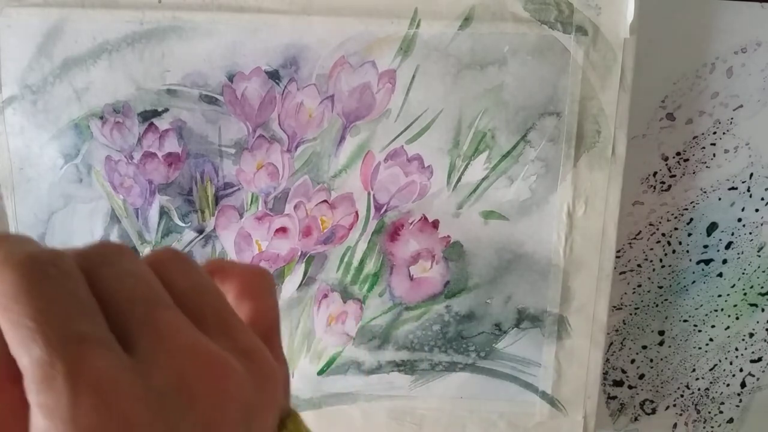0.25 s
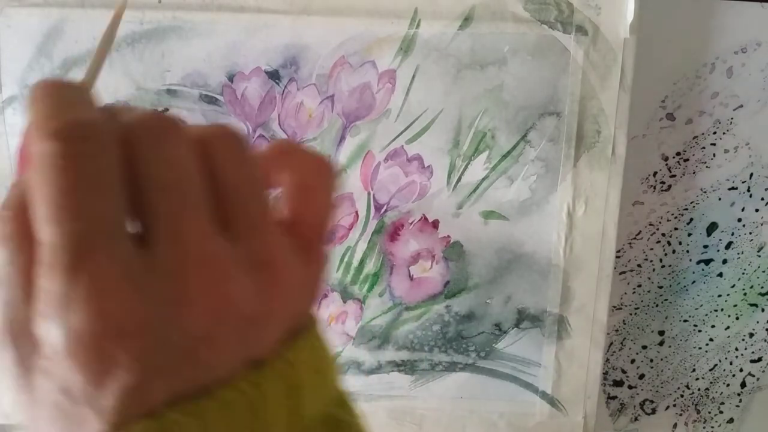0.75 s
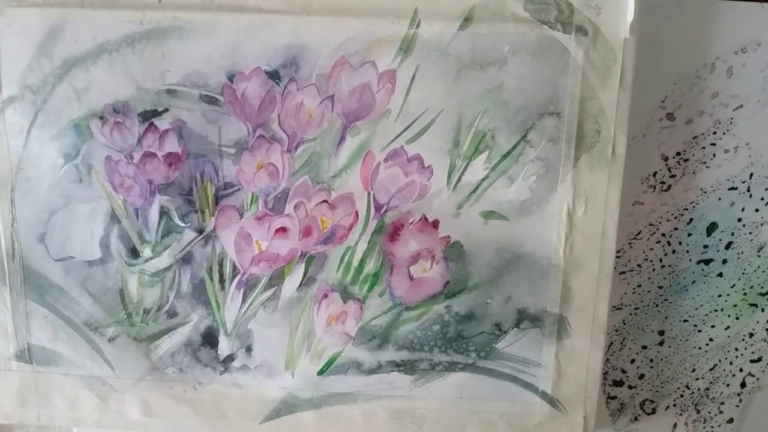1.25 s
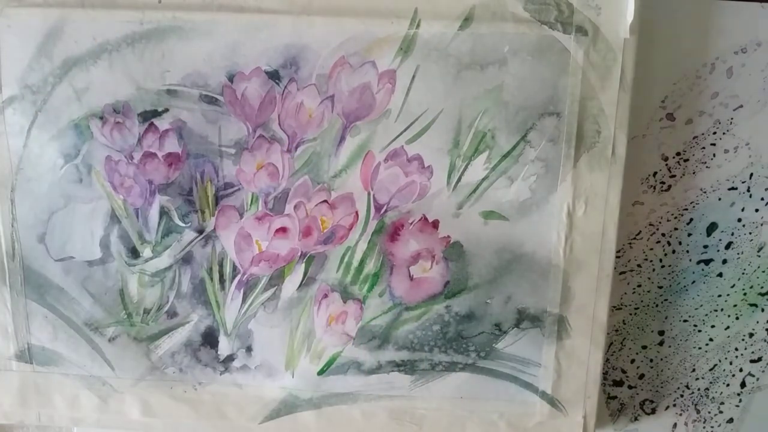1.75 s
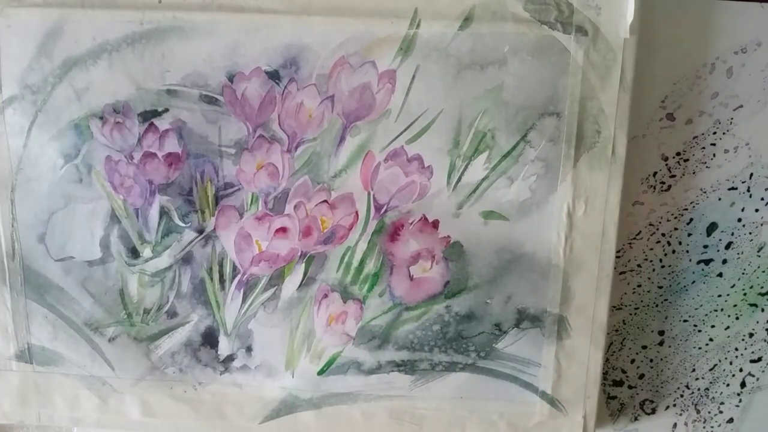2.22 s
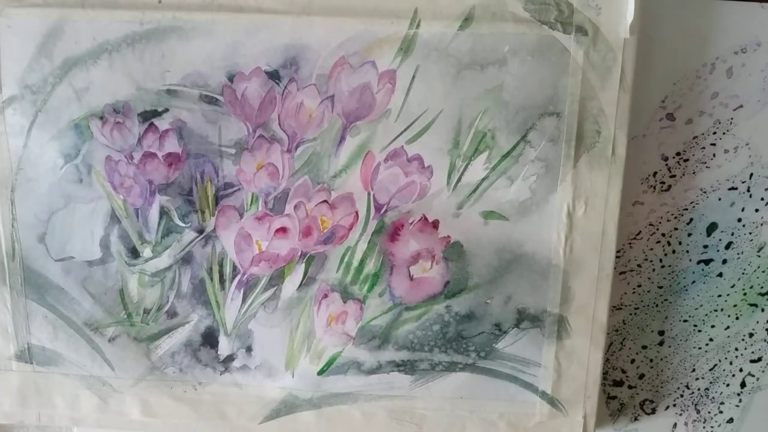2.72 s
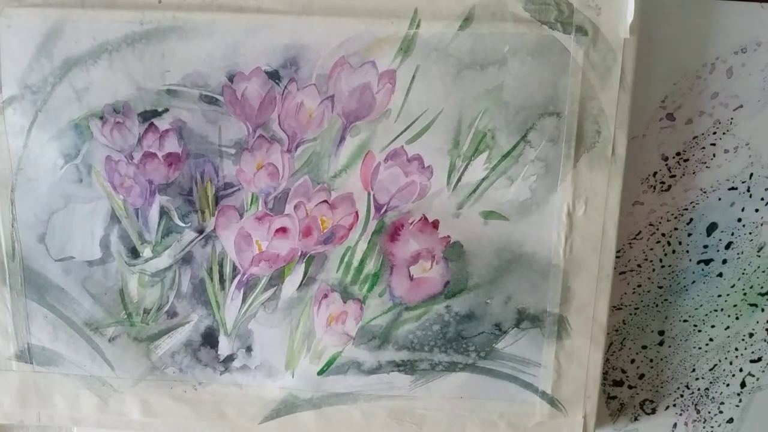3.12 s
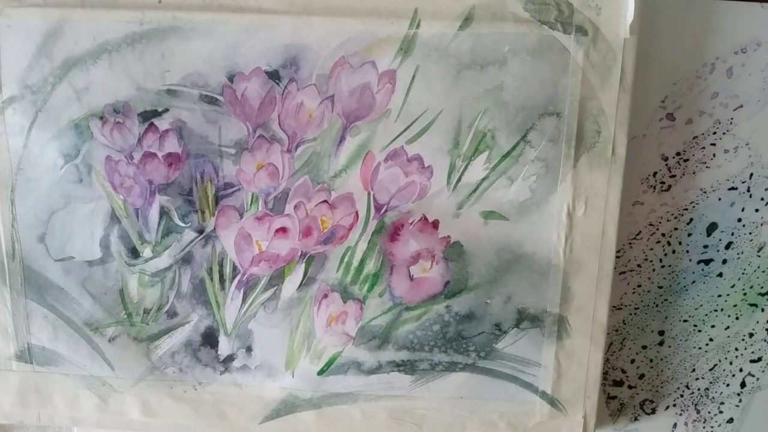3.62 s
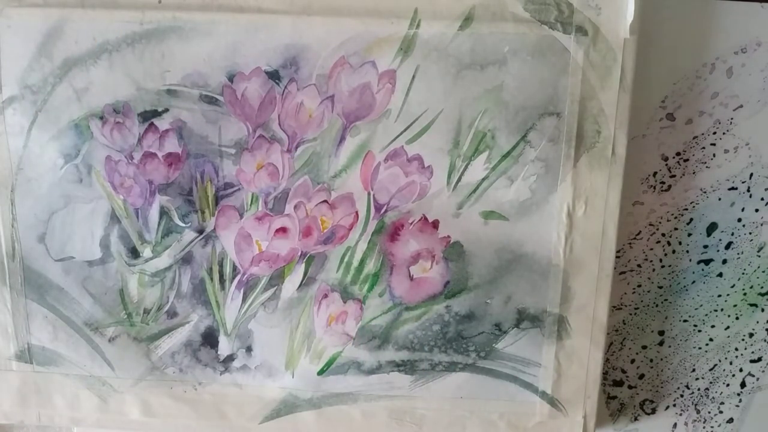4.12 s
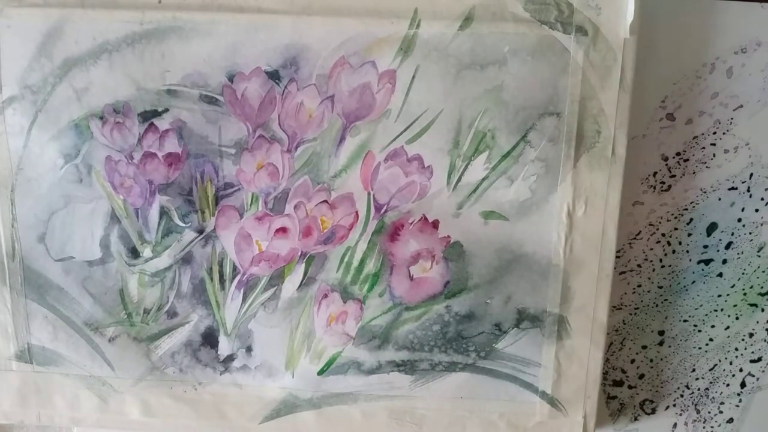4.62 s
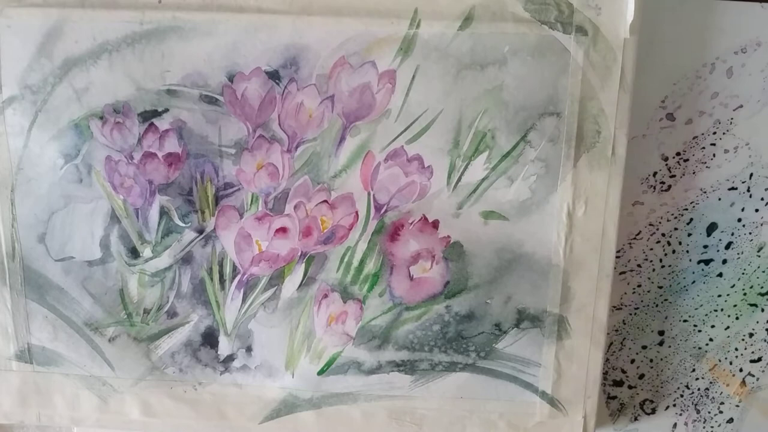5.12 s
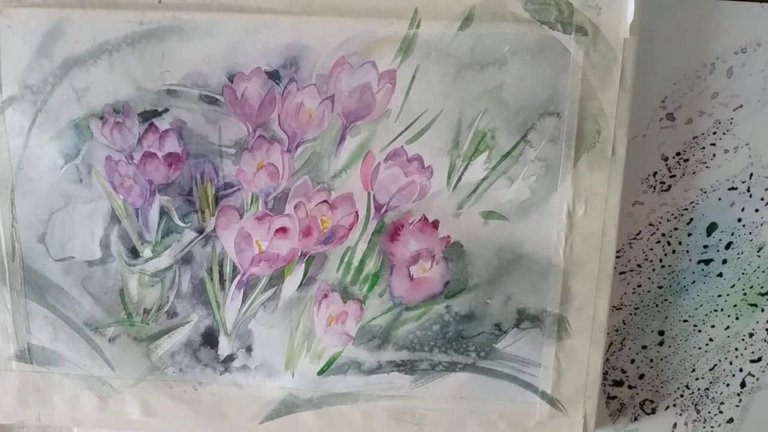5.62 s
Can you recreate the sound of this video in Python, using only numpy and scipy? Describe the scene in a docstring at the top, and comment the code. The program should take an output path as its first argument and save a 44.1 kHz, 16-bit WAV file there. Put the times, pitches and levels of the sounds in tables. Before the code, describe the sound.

A paintbrush is rinsed at a painting table, a little to the right of a stereo microphone. Faint bristle strokes and a dull knock come first. Then the water briefly chirps and fizzes while the metal ferrule clicks sharply on the glass jar, making it ring briefly. Small dry handle taps and two separate clicks follow. A woollen sleeve rustles softly on and off over the low hum and hiss of a small room.

```python
"""A paintbrush is rinsed in a glass water jar, to the right of a stereo microphone over a painting table. Its
ferrule clicks on the glass and sets the jar ringing; air pockets chirp and fizz in the water. The handle taps,
the table gives dull knocks, and before the rinse the bristles drag over paper. A woollen sleeve rustles, and
the stirred brush swishes steadily in the water. Behind it all is a small quiet room with a low murmur, a faint
hum and hiss."""
import sys
import numpy as np
from scipy import signal
from scipy.fft import rfft, irfft, next_fast_len
from scipy.io import wavfile
from scipy.ndimage import uniform_filter1d, map_coordinates

SR = 44100
rng = np.random.default_rng(int(sys.argv[2]) if len(sys.argv) > 2 else 0)


def dump_mix(stems):
    """Bounce the given channels to the path in sys.argv[1] as a 16-bit WAV at rate SR."""
    frames = np.atleast_2d(stems).T  # one column per channel
    limited = np.clip(frames, -1, 1)  # hard clip at full scale
    pcm = np.round(limited * 32767).astype(np.int16)
    wavfile.write(sys.argv[1], SR, pcm)


N = 258639


def amp(db):
    return 10 ** (np.asarray(db) / 20)


def unit_rms(x):
    return x / np.sqrt(np.mean(x ** 2) + 1e-20)


def curve(points, hz):
    """Reads (f/Hz, value) breakpoints on a log frequency axis."""
    f, values = np.transpose(points)
    return np.interp(np.log(hz + 1), np.log(f + 1), values)


def wobble(rate):
    """Smooth random modulation, rate knots a second."""
    return map_coordinates(rng.standard_normal(int(N * rate / SR) + 4), [np.arange(N) * rate / SR])


def swell(peak, rise, fall):
    """Envelope of one gesture, 13 dB down at one rise time before its peak and one fall time after."""
    t = np.arange(N) / SR - peak
    return amp(-13 * np.abs(t / np.where(t < 0, rise, fall)) ** 1.3)


def filtered(x, response):
    """Filters x with a complex frequency response."""
    n = x.shape[-1]
    size = next_fast_len(n + 8192)
    return irfft(rfft(x, size) * response(np.fft.rfftfreq(size, 1 / SR)), size)[..., :n]


def resonators(modes, passes=1):
    """Response of a band-pass bank (f/Hz, width/Hz, level/dB), run passes times in series."""
    return lambda f: sum((-1) ** k * amp(db) * 1j * f * width / (hz * hz - f * f + 1j * f * width)
                         for k, (hz, width, db) in enumerate(modes)) ** passes


def ring(modes, t, attack_s):
    """Damped modes (f/Hz, level/dB, t60/s), balanced a little differently on each hit."""
    tones = sum(amp(db + rng.normal(0, 1.0) - 60 * t / t60) * np.sin(2 * np.pi * hz * t)
                for hz, db, t60 in modes)
    return tones * (1 - np.exp(-t / attack_s))


def noise_bed(spectrum, correlation, patchy_db, top_hz=15750):
    """Shaped stereo noise of rms 1, its gain mottled over time and frequency."""
    bins = signal.stft(rng.standard_normal((2, N)), nperseg=512)[2]
    patches = uniform_filter1d(rng.standard_normal(bins.shape[1:]), size=6, axis=0)
    patches = unit_rms(uniform_filter1d(patches, size=10, axis=1))
    noise = signal.istft(bins * amp(patchy_db * patches), nperseg=512)[1][:, :N]

    def mid_side_eq(hz):
        spread = np.arccos(np.clip(curve(correlation, hz), -1, 1)) / 2
        return amp(curve(spectrum, hz)) * (hz < top_hz) * [np.cos(spread), np.sin(spread)]

    mid, side = filtered(noise, mid_side_eq)
    return unit_rms(np.array([mid + side, mid - side]))


# Decay of the room: f/Hz, t60/s
ROOM_DECAY = [(300, 0.42), (2000, 0.31), (8000, 0.12), (15000, 0.12)]


def place(out, start, sound, pan_db, room_db, left_lag=13):
    """Mixes in a sound with its own room tail, left_lag samples late on the left; pan_db > 0 is left."""
    sound = np.broadcast_to(sound, (2, sound.shape[-1]))
    hz, t, bins = signal.stft(rng.standard_normal((2, SR // 3)), SR, nperseg=128)
    tail = signal.istft(bins * amp(-60 * t / curve(ROOM_DECAY, hz)[:, None]), SR, nperseg=128)[1]
    predelay = round(0.0028 * SR)
    tail = np.pad(tail / np.linalg.norm(tail[0]), ((0, 0), (predelay, 0)))
    heard = amp(room_db) * signal.fftconvolve(sound[1:], tail, axes=1)
    heard[:, :sound.shape[1]] += sound * amp([[pan_db / 2], [-pan_db / 2]])
    for side, lag in enumerate((left_lag, 0)):
        out[side, round(start * SR) + lag:][:heard.shape[1]] += heard[side]


# Colour of the murmur: f/Hz, level/dB
MURMUR_EQ = [(30, -12), (68, -28), (95, -10.5), (125, -12), (175, -3.5), (250, -3), (380, -12), (430, -8),
             (470, -11), (640, -14), (1500, -15.5), (3000, -120)]
# Stereo image of the murmur: f/Hz, left-right correlation (clipped to -1..1 when played)
MURMUR_IMAGE = [(60, 1), (240, 0.37), (950, 0.18), (3770, -2.1), (15000, -0.67)]
# Colour of the hiss: f/Hz, level/dB
HISS_EQ = [(900, -77), (1500, -2), (3000, -3), (8000, -3.5), (9500, -2), (11000, 1.5), (13000, -2),
           (14500, -3.5)]


def room_tone():
    """Low murmur of the house, microphone hiss and a faint wavering hum."""
    hum_level = amp(-72.5 + 3.9 * wobble(15))
    hum_hz = 425 + 8 * wobble(25)
    hum = hum_level * np.sin(2 * np.pi * np.cumsum(hum_hz) / SR)
    murmur = amp(-62.5) * noise_bed(MURMUR_EQ, MURMUR_IMAGE, patchy_db=1.0)
    hiss = amp(-59.5) * noise_bed(HISS_EQ, [(5000, 0.0096)], patchy_db=1.6)
    return murmur + hiss + hum


# Colours of the rustles' airy hiss and of their coarser rub: f/Hz, level/dB
RUSTLE_HISS_EQ = [(2500, -120), (4000, -52), (5500, -8), (6500, 4.5), (8500, 4.5), (11000, 6), (15100, 4),
                  (16000, -5)]
RUSTLE_RUB_EQ = [(500, -120), (1300, -8.5), (2300, -8), (3100, -5), (4000, -4.5), (4900, -5.5), (6200, -2.5),
                 (7500, -32), (9000, -120)]
# Rustles: sleeve moves, and from 2.0 to 2.95 s the steady swish of the brush stirred in the water: peak t/s,
# rise/s, fall/s, hiss level/dB, rub against hiss/dB, pan/dB
RUSTLES = [(.675, 0.029, 0.029, -52.5, -9, 5), (.705, 0.036, 0.053, -52, -5, 2),
           (1.39, 0.096, 0.041, -57, -7, -1), (1.53, 0.13, 0.2, -49, -10, 2),
           (2.0, 0.58, 0.13, -57, -6.5, -1), (2.52, 1, 0.2, -56, -3.5, -1.5),
           (2.95, 0.91, 0.33, -61.5, -6.5, -0.5), (4.47, 0.043, 0.065, -62, -5.5, -1),
           (4.66, 0.13, 0.35, -56, -11, -0.5), (4.84, 0.12, 0.32, -56.5, -7, -1),
           (5.35, 0.23, 0.1, -54.5, -15, 2), (5.86, 0.31, .1, -61.5, -12, 2)]


def rustles():
    """Wool fibres slip over each other, and the stirred brush swishes the water: a fine hiss and a coarser rub,
    both slightly grainy."""
    hiss_power, rub_power = np.zeros((2, 2, N))
    for peak, rise, fall, db, rub_db, pan_db in RUSTLES:
        power = (amp(db + np.array([[.5], [-.5]]) * pan_db) * swell(peak, rise, fall)) ** 2
        hiss_power += power
        rub_power += amp(rub_db) ** 2 * power
    grain = amp(.7 * wobble(40) + wobble(200))
    rub = np.sqrt(rub_power) * noise_bed(RUSTLE_RUB_EQ, [(2000, .1)], patchy_db=3)
    hiss = np.sqrt(hiss_power) * noise_bed(RUSTLE_HISS_EQ, [(5000, .02)], patchy_db=1.8)
    return amp(2.5) * grain * (hiss + rub * amp(2 * wobble(130)))


# Strokes on paper, then on the jar's rim: peak t/s, rise/s, level/dB, centre f/Hz, width/Hz
BRUSH_STROKES = [(.18, 0.043, -70, 1930, 1500), (.47, 0.24, -63.5, 2180, 3000),
                 (.672, 0.025, -53, 4640, 1600), (.73, 0.071, -68, 2300, 348), (1.03, .09, -69, 1960, 1500),
                 (2.01, .09, -59, 12400, 2000), (2.13, 0.07, -60, 12100, 2000)]


def bristles():
    """Bristles slip over a surface in small grains; each stroke has its own band."""
    out = np.zeros((2, N))
    grains = amp(3.5 * wobble(150)) * rng.standard_normal((2, N))
    for peak, rise, db, hz, width in BRUSH_STROKES:
        band = unit_rms(filtered(grains, resonators([(hz, width, 0)], passes=2)))
        out += amp(db + 4) * swell(peak, rise, fall=0.065) * band
    return out


# Modes of the table top: f/Hz, level/dB, t60/s
TABLE_MODES = [(192.6, -10.5, 0.18), (243, 0.5, 0.097), (305, 5, 0.043), (347, 2.5, 0.042),
               (442, 0.5, 0.061), (706, -2.5, 0.024)]
# Knock cues: t/s, level/dB
TABLE_KNOCKS = [(1.922, -30.5), (2.665, -50.5), (3.0548, -47)]


def table_knocks(rebound_s=.0165, dulling_db_per_khz=28):
    """Slow pushes ring the table top; each settles in two duller rebounds."""
    out, t = np.zeros((2, N + SR)), np.arange(SR // 3) / SR
    for start, db in TABLE_KNOCKS:
        for k in range(3):
            modes = [(hz, level - k * dulling_db_per_khz * hz / 1000, t60)
                     for hz, level, t60 in TABLE_MODES]
            thud = amp(db) * ring(modes, t, attack_s=0.0057)
            place(out, start + k * rebound_s, thud, pan_db=-1.5, room_db=-10)
    return out[:, :N]


# Modes of the handle: multiple of the tap's pitch, level/dB, t60/s
HANDLE_MODES = [(1, 0, .013), (1.35, -4, .008), (.7, -6, .008)]
# Tap cues: t/s, level/dB, f/Hz
HANDLE_TAPS = [(.487, -46, 1280), (2.985, -37.5, 1710), (2.9937, -37, 1800), (3.012, -42, 1880),
               (4.313, -45.5, 5160)]


def handle_taps():
    """The wooden handle gives small dry taps that die at once."""
    out, t = np.zeros((2, N + SR)), np.arange(SR // 3) / SR
    for start, db, hz in HANDLE_TAPS:
        modes = [(ratio * hz, level, t60) for ratio, level, t60 in HANDLE_MODES]
        tap = amp(db) * ring(modes, t, attack_s=.0004)
        place(out, start, tap, pan_db=-1.5, room_db=-14, left_lag=3)
    return out[:, :N]


def air_pocket(start_hz, end_hz, length, flutter_per_s=250):
    """One bubble rings: a tone that swells fast, glides, flutters and fades."""
    progress = np.arange(round(length * SR)) / (length * SR)
    hz = start_hz + (end_hz - start_hz) * progress ** 1.35
    knots = rng.standard_normal(2 + round(flutter_per_s * length))
    flutter = amp(2.3 * np.interp(progress, np.linspace(0, 1, len(knots)), knots))
    envelope = np.sin(np.pi * progress ** .5) ** 1.08
    return flutter * envelope * np.sin(2 * np.pi * np.cumsum(hz) / SR)


# Single bubbles: t/s, start f/Hz, end f/Hz, length/s, level/dB, pan/dB
BUBBLE_CHIRPS = [(2.1625, 2930, 3100, 0.0085, -29, -2), (2.167, 7850, 7900, 0.0031, -29, -4),
                 (2.171, 2940, 3080, 0.0096, -41.5, 0), (2.179, 896, 1020, 0.052, -42, 0),
                 (2.21, 1174, 2320, 0.026, -44, -7), (2.23, 1430, 2460, 0.0162, -44, -9),
                 (2.291, 1390, 1270, 0.017, -32, -1), (2.295, 1194, 1280, 0.021, -39.5, 1),
                 (2.288, 272.6, 267, 0.16, -53, -3), (2.331, 1204, 2250, 0.022, -42, -12.5),
                 (2.339, 1374, 1890, 0.0176, -46, -11), (2.469, 2850, 3220, 0.008, -29.5, 3),
                 (2.537, 2870, 3170, 0.01, -51, -7), (2.548, 2970, 3220, 0.0095, -49, -9),
                 (3.071, 276, 260, 0.088, -55.5, -1), (4.091, 257, 245, 0.053, -54, 5),
                 (4.137, 240, 232, 0.065, -54, 3), (4.216, 223, 180, 0.11, -55, 0)]
# Clouds of tiny bubbles: start t/s, end t/s, count, centre f/Hz, level/dB
FIZZ_CLOUDS = [(2.22, 2.28, 20, 1800, -61), (2.3, 2.41, 45, 1900, -59.5), (2.51, 2.66, 100, 4500, -61)]


def bubbles():
    """Air rings in the water: larger pockets one by one, tiny ones in fading clouds."""
    out = np.zeros((2, N + SR))
    for start, start_hz, end_hz, length, db, pan_db in BUBBLE_CHIRPS:
        place(out, start, amp(db) * air_pocket(start_hz, end_hz, length), pan_db, room_db=-17)
    for start, end, count, centre_hz, db in FIZZ_CLOUDS:
        cloud = np.zeros(round((end - start) * SR) + SR // 20)
        for when, pitch, strength in rng.random((int(count), 3)):
            hz = centre_hz * np.exp(.9 * (pitch - .5))
            blip = amp(5 * strength + 12.5 - 33 * when) * air_pocket(hz, 1.2 * hz, length=14 / hz)
            cloud[round(when * (end - start) * SR):][:len(blip)] += blip
        place(out, start, amp(db) * cloud, pan_db=-2, room_db=-8)
    return out[:, :N]


# Colour of the click's attack: f/Hz, level/dB
CRACK_EQ = [(2060, -20), (2800, -3), (3500, -40), (3760, -37), (4550, -13), (5400, -2.5), (6320, -14.5),
            (7850, 0), (8430, -0.5), (12500, 2), (15700, -1), (16800, -69)]


def glass_crack(burst, notch_depth, notch_hz=5360, half_width_hz=720):
    """The bright edge of a hit, scooped in the quiet band between the glass wall's rings."""
    def response(hz):
        low_cut = hz ** 4 / (hz ** 4 + 3000 ** 4)
        notch = 1 - notch_depth * np.exp(-((hz - notch_hz) / half_width_hz) ** 4)
        return amp(curve(CRACK_EQ, hz)) * low_cut * notch

    return filtered(burst, response)


# Bright ring of the glass wall: f/Hz, width/Hz, level/dB
WALL_MODES = [(4530, 150, 3), (6160, 76, 1.5), (6380, 190, 2), (6950, 63, -6), (7800, 100, 1)]
# Lower ring of the filled jar: f/Hz, width/Hz, level per pass/dB
BODY_MODES = [(2700, 2850, -2.5), (2950, 420, 3.5), (3390, 360, -10)]
# Hollow knock of the jar's air and base: f/Hz, level/dB, t60/s
HOLLOW_MODES = [(538, 9, 0.053), (324, 1.5, 0.055), (725, 2, 0.042), (940, 2, 0.032), (1194, 5, 0.035)]
# Hits: t/s, level/dB, table bounce gain, wall ring/dB, body ring/dB, knock/dB, pan/dB, notch depth
FERRULE_HITS = [(2.2911, -8, 2.1, 0, -10, -48, -0.5, 0.81), (2.2976, -27, 0.69, 11.5, -12, -22.5, -12, .9),
                (2.3175, -34, 0.5, 2, -12, -25, -2, .9), (2.4690, -18, 0.36, 1.5, 3.5, -26, -1.5, .02),
                (2.4819, -22.5, 0.43, 2, 6, -31, -6, .02), (2.4965, -26.5, 0.68, 1.5, 2, -30, -4, .02),
                (3.8395, -9, 0.64, -34, -17, -37.5, -1.5, 0.064),
                (4.0636, -10, 1.1, -16.5, -30, -37.5, -4, .05)]


def ferrule_clicks():
    """Metal strikes glass: a spike, its bounce off the table and its scatter; the jar rings and knocks."""
    out, t = np.zeros((2, N + SR)), np.arange(SR // 8) / SR
    lead = SR // 250  # samples of silence ahead of each hit
    push = np.exp(-t / .00002)
    spike = push - np.roll(push, 2)  # a push and its rebound
    shade = np.array([[.3], [1.9]])  # the recorder's body shades the left microphone
    for start, db, bounce, wall_db, body_db, knock_db, pan_db, notch_depth in FERRULE_HITS:
        strike = spike + bounce * np.roll(spike, round(0.0012 * SR))
        scatter = amp(-1 - 60 * t / .024) * rng.standard_normal((2, len(t)))
        burst = np.pad(shade * strike + scatter, ((0, 0), (lead, 0)))
        wall = amp(wall_db) * filtered(burst, resonators(WALL_MODES))
        body = amp(body_db) * filtered(burst, resonators(BODY_MODES, passes=2))
        click = amp(db) * (0.66 * glass_crack(burst, notch_depth) + wall + body)
        place(out, start - lead / SR, click, pan_db, room_db=-6.5)
        knock = amp(db + knock_db) * ring(HOLLOW_MODES, t, attack_s=0.0032)
        place(out, start + 0.00219, knock, pan_db=1, room_db=-7)
    return out[:, :N]


def scene():
    return (ferrule_clicks() + bubbles() + handle_taps() + table_knocks()
            + rustles() + bristles() + room_tone())


def record(dry, low_cut_hz=85, top_hz=16900):
    """The microphone rolls off deep bass; the recorder keeps nothing above its band limit."""
    return filtered(dry, lambda hz: (1j * hz / (low_cut_hz + 1j * hz)) ** 3 * (hz < top_hz))


dry = scene()
out = record(dry)
dump_mix(out)
```